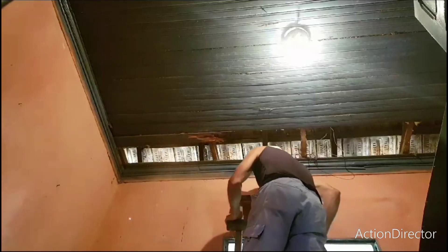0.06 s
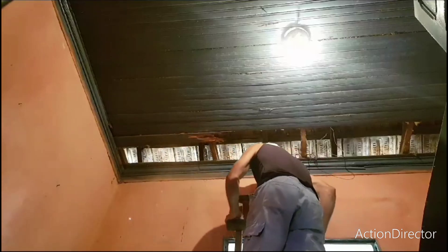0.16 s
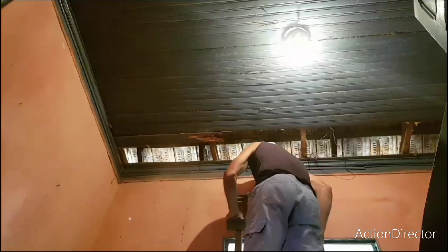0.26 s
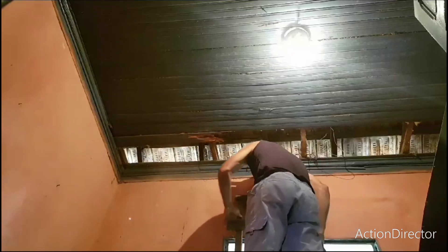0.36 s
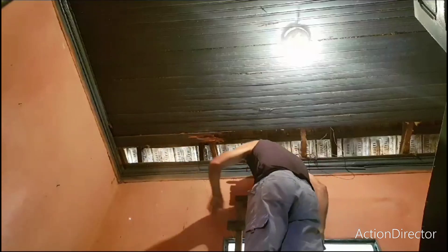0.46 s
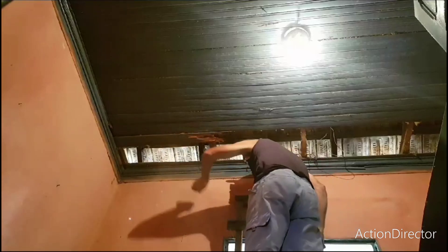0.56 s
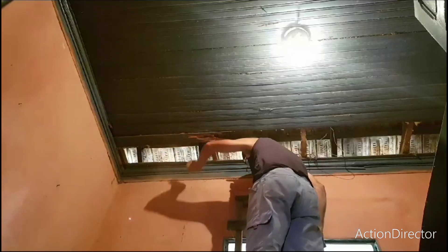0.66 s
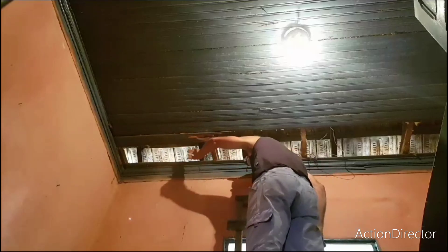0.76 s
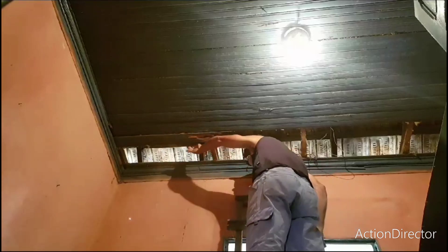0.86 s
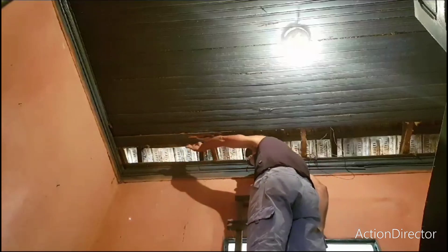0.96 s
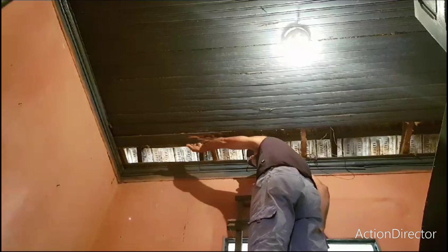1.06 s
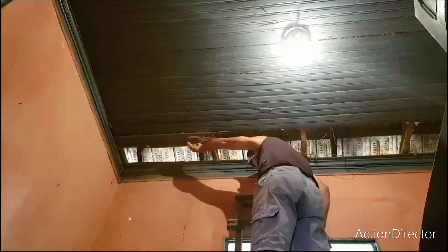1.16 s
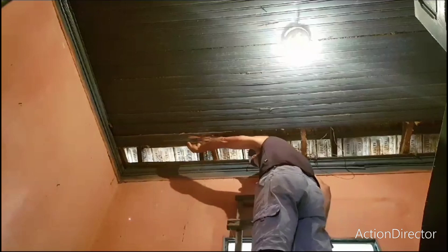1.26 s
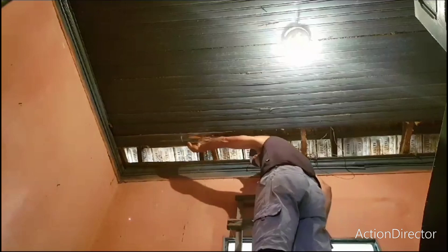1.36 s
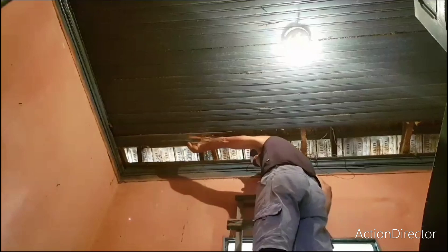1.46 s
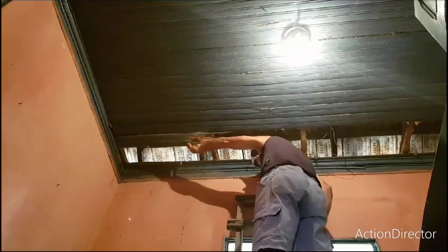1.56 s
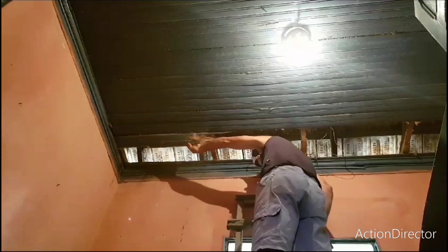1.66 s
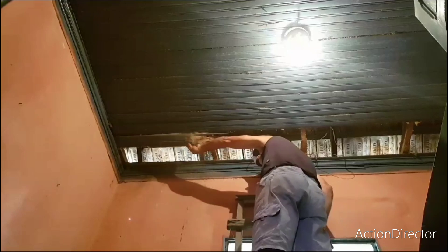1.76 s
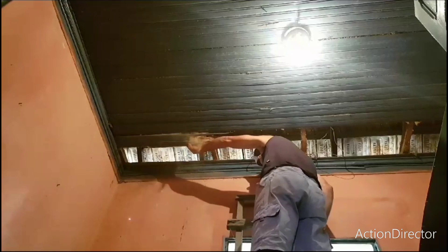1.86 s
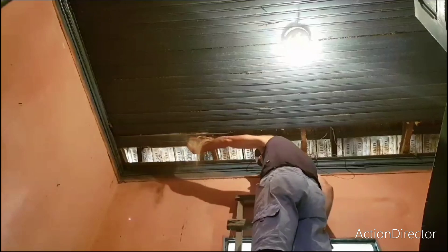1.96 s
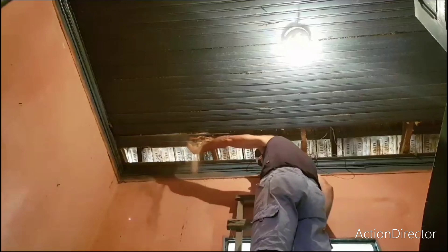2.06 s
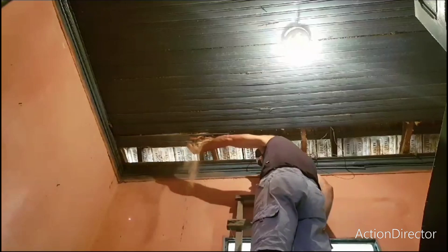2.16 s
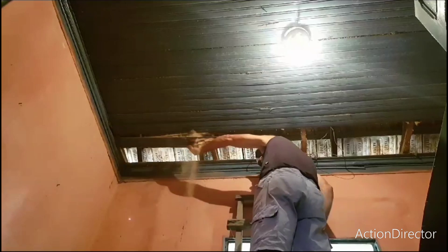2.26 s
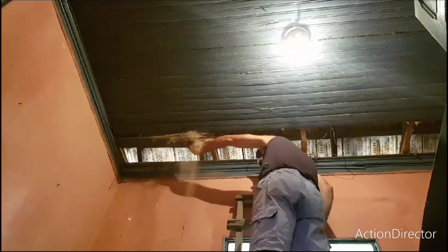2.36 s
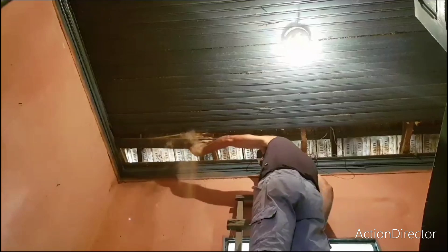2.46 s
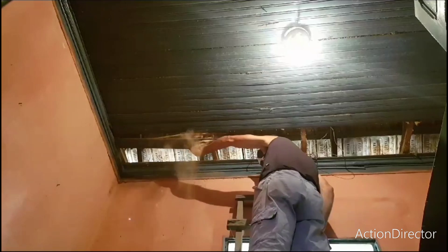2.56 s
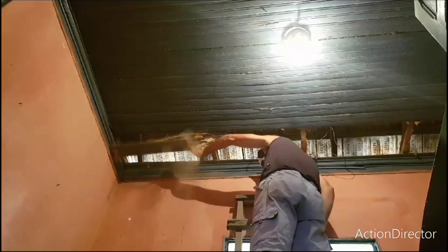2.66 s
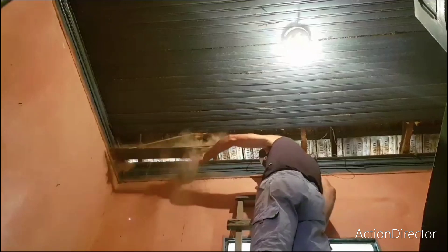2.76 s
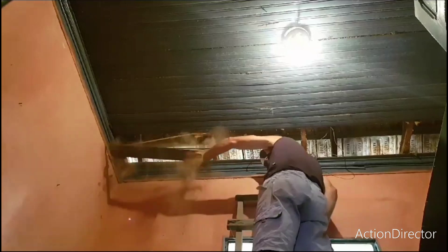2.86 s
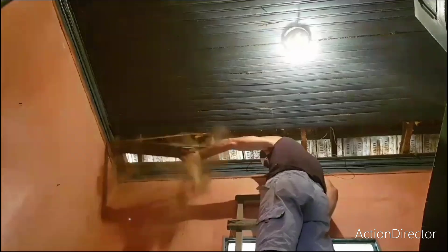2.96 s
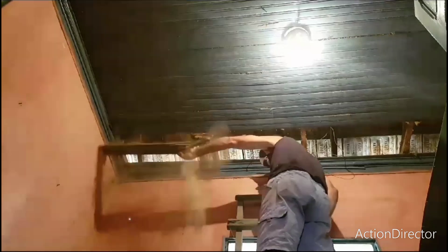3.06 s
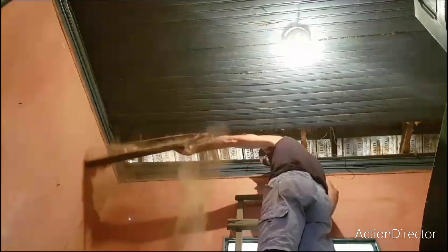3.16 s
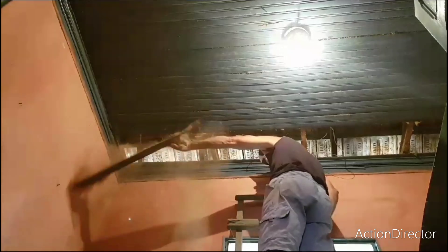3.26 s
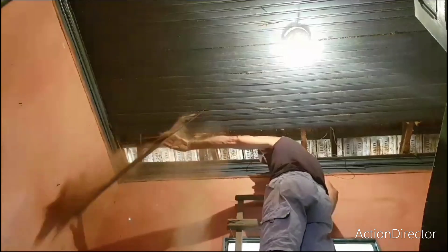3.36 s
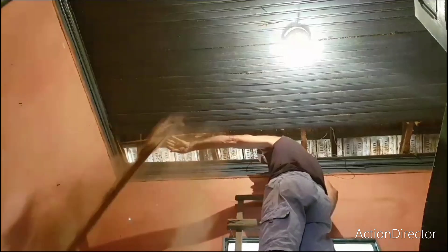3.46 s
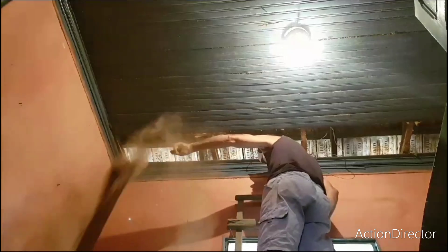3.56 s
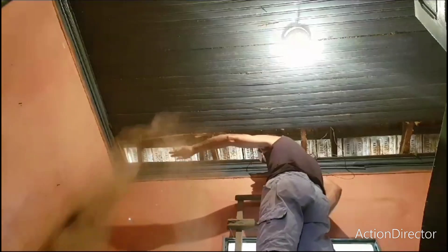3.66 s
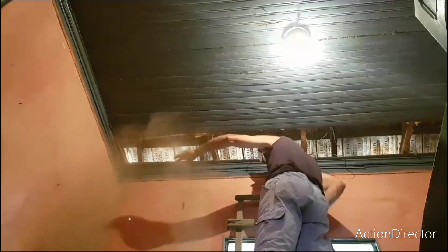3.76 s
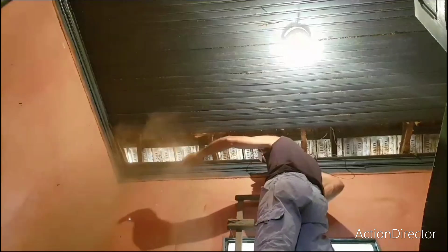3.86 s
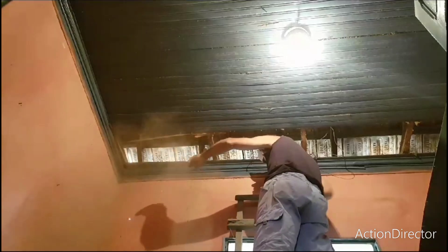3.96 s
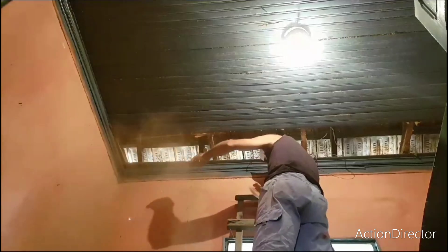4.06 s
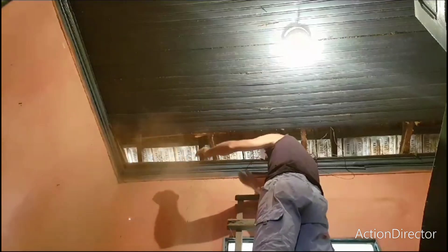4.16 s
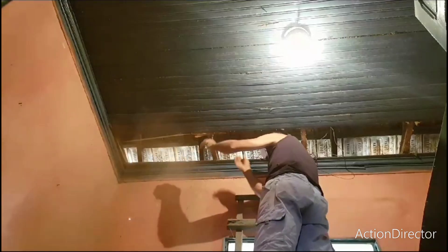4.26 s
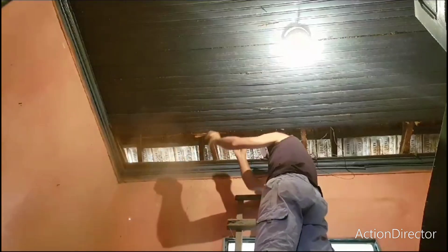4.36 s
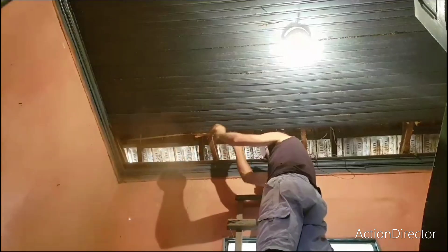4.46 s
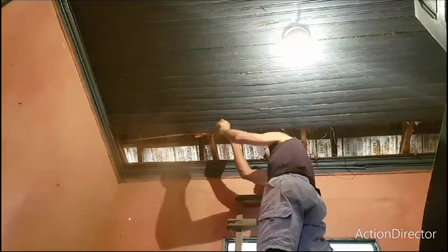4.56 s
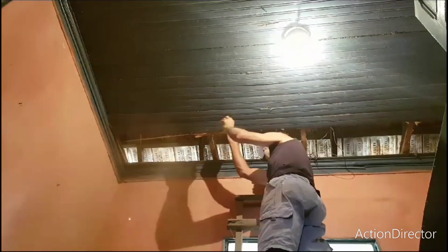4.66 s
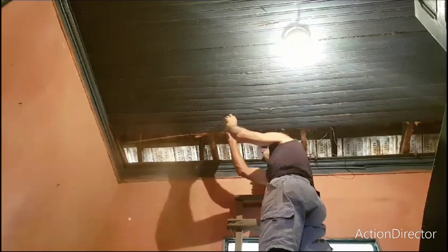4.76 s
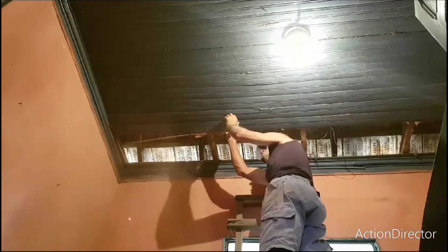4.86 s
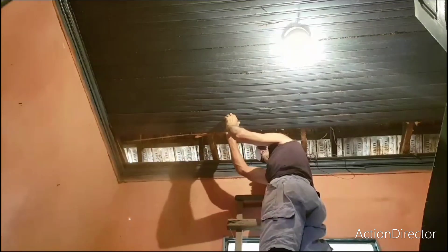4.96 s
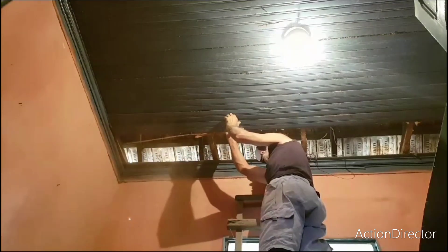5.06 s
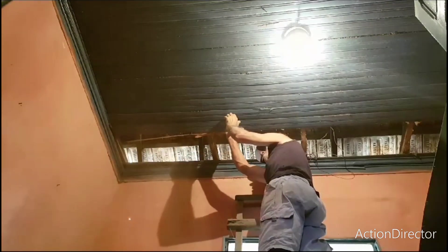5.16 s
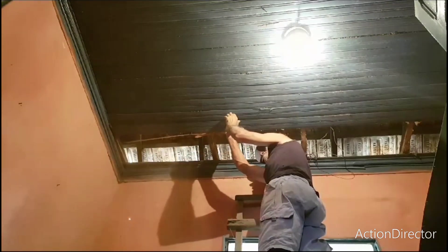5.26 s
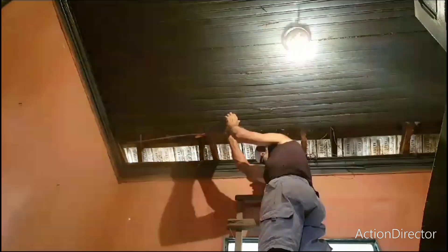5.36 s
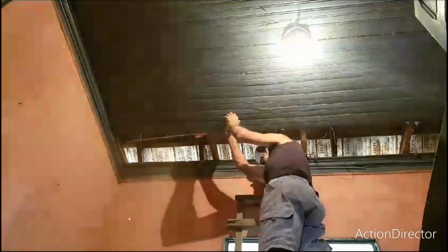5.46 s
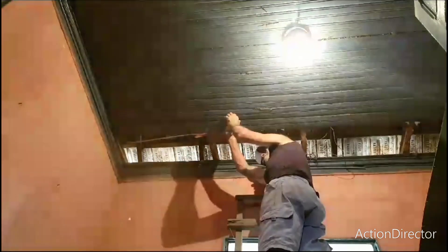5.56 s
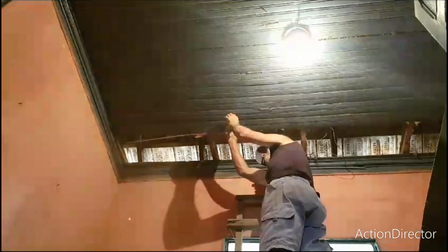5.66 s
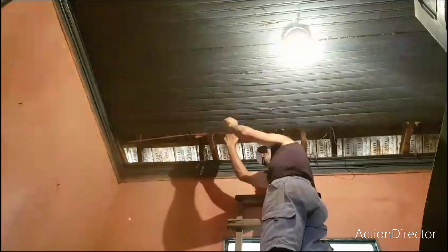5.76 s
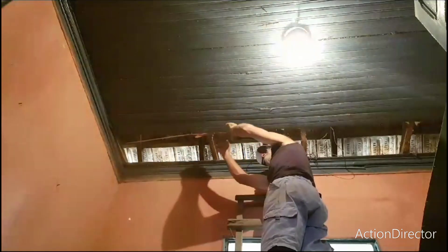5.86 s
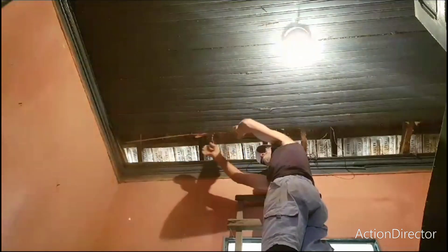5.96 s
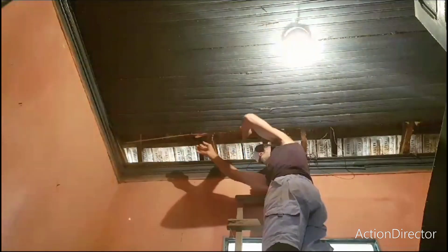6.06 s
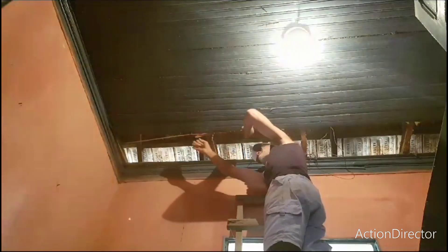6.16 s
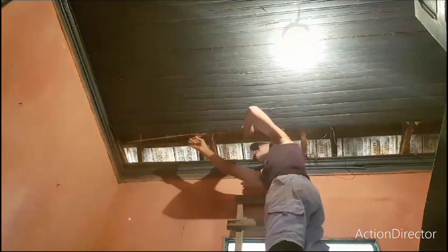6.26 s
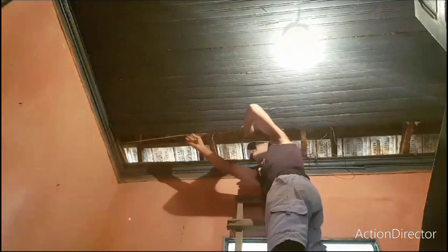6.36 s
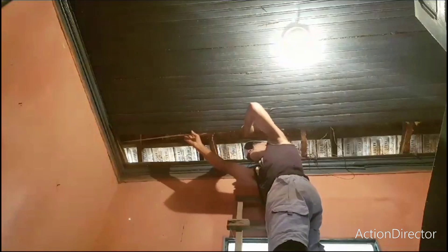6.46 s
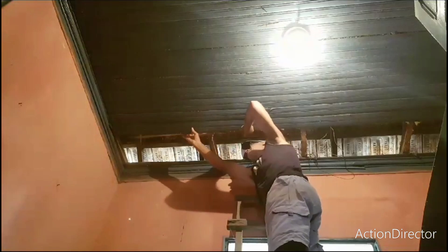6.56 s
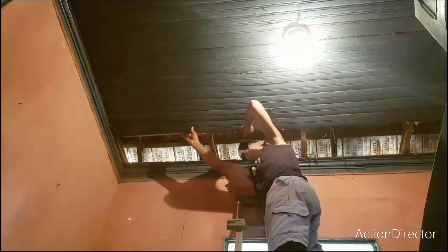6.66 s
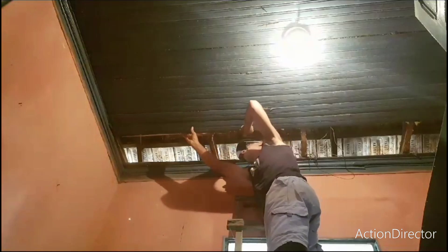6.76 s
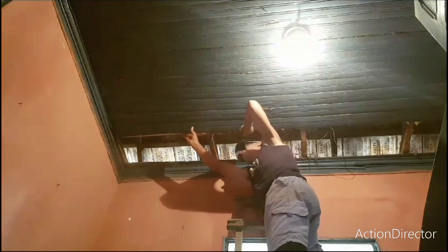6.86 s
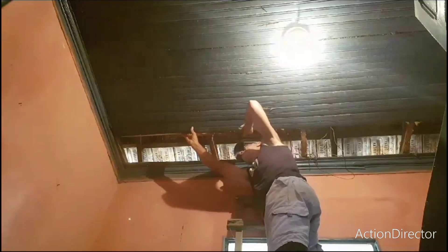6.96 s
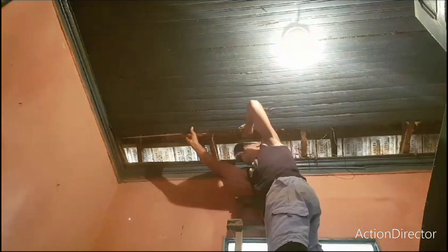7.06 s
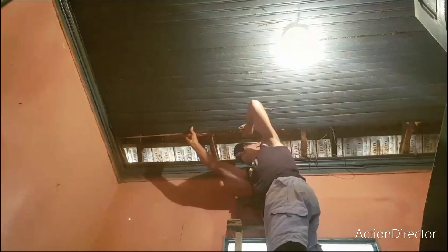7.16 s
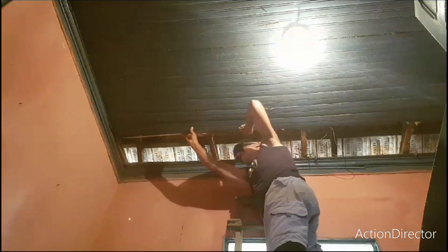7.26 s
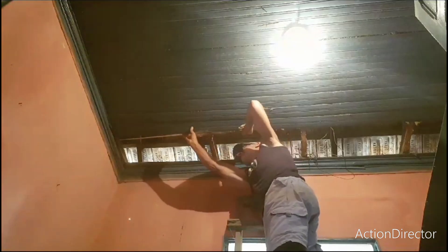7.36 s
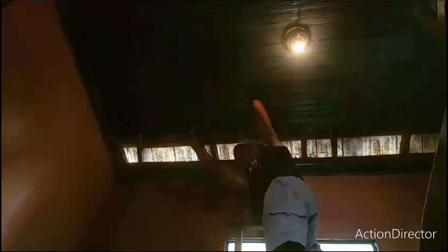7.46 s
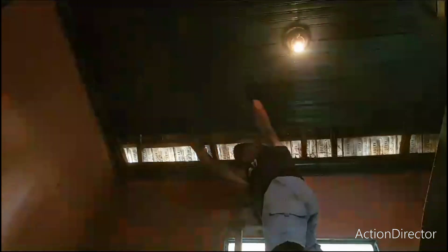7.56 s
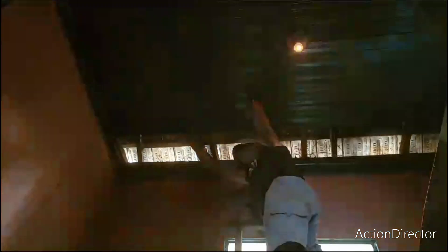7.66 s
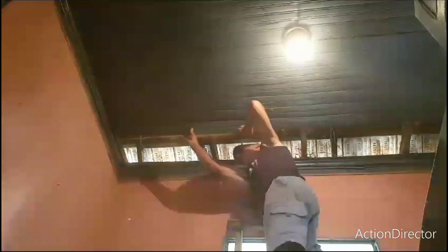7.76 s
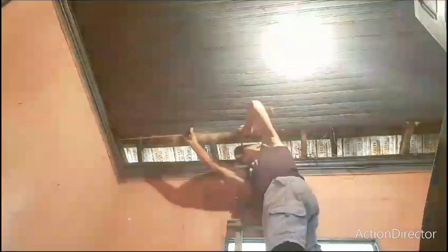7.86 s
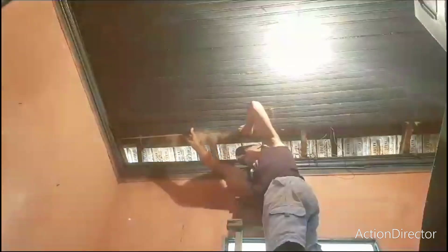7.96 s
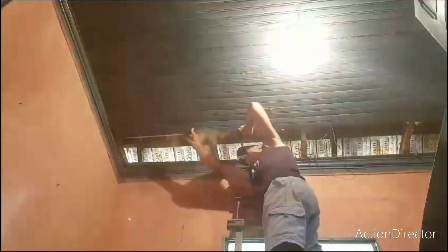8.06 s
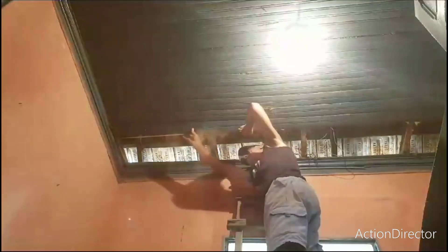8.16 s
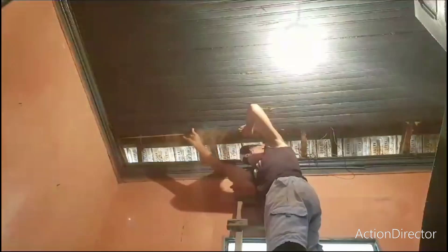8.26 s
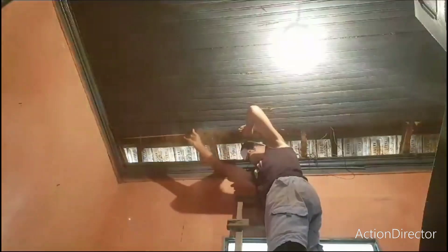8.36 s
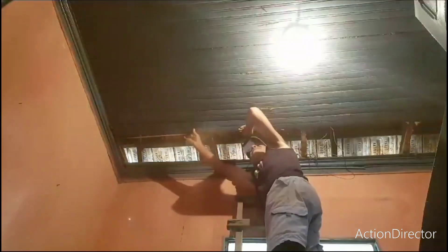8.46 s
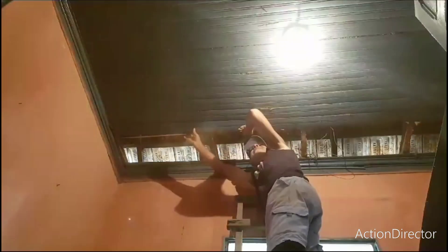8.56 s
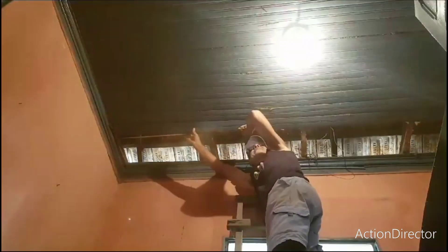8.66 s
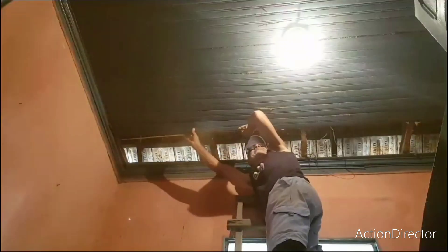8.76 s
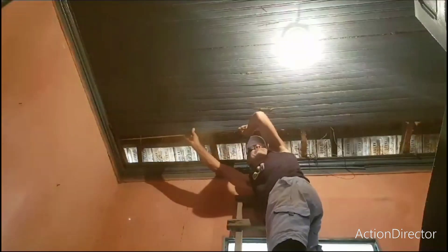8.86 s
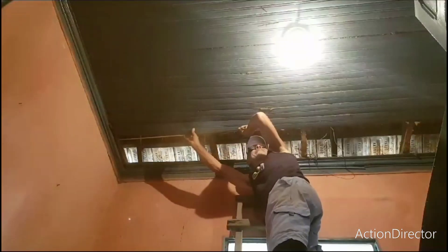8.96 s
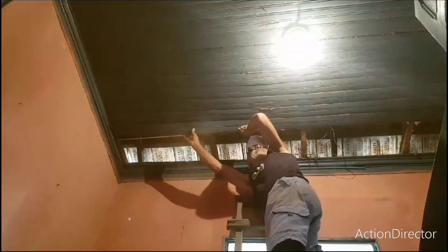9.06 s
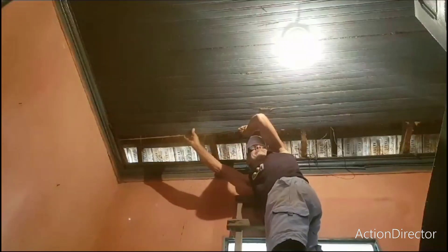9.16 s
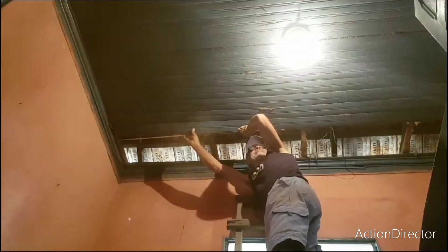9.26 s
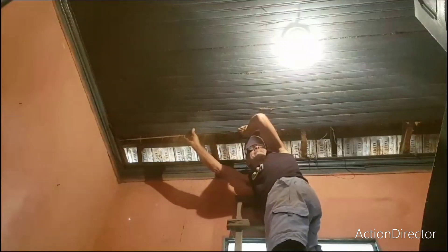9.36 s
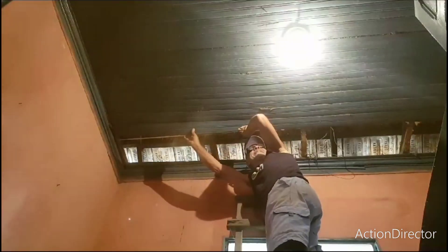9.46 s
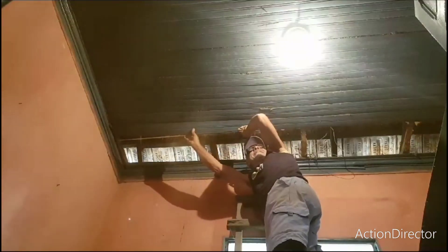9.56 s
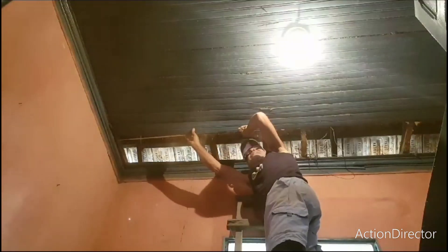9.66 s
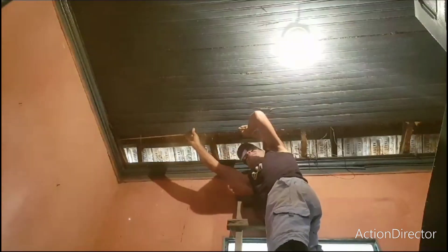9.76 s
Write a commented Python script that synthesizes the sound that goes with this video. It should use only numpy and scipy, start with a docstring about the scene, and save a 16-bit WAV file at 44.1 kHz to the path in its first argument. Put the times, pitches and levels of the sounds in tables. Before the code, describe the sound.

Rotten wooden ceiling boards crack and splinter in bursts as they are pulled down by hand, with crumbs trickling in a small room.

```python
"""Rotten ceiling boards crack and knock as they are torn down by hand in a small bare room.
Each crack is a snap and a spray of breaking fibres over the low thud of the ceiling. Nails slip and
squeal out of the joists; dust and crumbs trickle down in showers of tiny clicks. The hard walls answer
with echoes and a tail, and a low rumble from outside and a thin high whine fill the pauses."""
import sys
import numpy as np
from scipy import signal
from scipy.fft import rfft, irfft, next_fast_len
from scipy.io import wavfile
from scipy.ndimage import map_coordinates

SR = 44100
rng = np.random.default_rng(int(sys.argv[2]) if len(sys.argv) > 2 else 0)


def unload_wav(signal):
    """Save mono or channel-first audio to the path in sys.argv[1] as 16-bit WAV at rate SR, clipped to [-1, 1]."""
    wavfile.write(
        sys.argv[1],
        SR,
        np.round(np.clip(np.atleast_2d(signal).T, -1, 1) * 32767).astype(np.int16),
    )


N = 433062

# colour of the outside rumble: freq_hz, density_db
RUMBLE_EQ = [(12, -38.5), (20, 0.5), (70, 2), (163, -1), (241, -5.5), (301, -12), (542, -20), (1000, -21.5),
             (1220, -26.5), (2080, -27), (2600, -42), (3070, -42), (9670, -52.5), (13000, -43),
             (16000, -51)]
# fader ride on the rumble: time_s, level_db
RUMBLE_RIDE = [(0.0, -46), (1.53, -49.5), (1.91, -43), (2.29, -49.5), (2.76, -45.5), (3.72, -47),
               (4.13, -47.5), (6.51, -50), (8.01, -42.5), (9.08, -46.5), (9.82, -46.5)]
# wavering low tones: pitch_hz, half_width_hz, level_db
DRONES = [(54, 8, -76), (183.9, 4.1, -59.5)]
# drift of the whine: time_s, pitch_hz, level_db
WHINE_PATH = [(0, 12140, -91), (5.8, 12220, -91), (5.9, 12350, -90), (6.4, 12250, -91), (7.0, 12330, -91),
              (9.82, 12300, -92)]
# early reflections: delay_s, gain_db
WALL_ECHOES = [(.004, 1.5), (.009, -5), (0.0169, 1.5), (.024, -7), (.038, -3.5), (.061, -10.5)]
# time the room takes to die by 60 dB: freq_hz, decay_s
ROOM_DECAY = [(100, 0.22), (260, 0.42), (700, 0.4), (1840, 0.39), (4850, 0.36), (12800, 0.25)]
# left-right likeness of the room sound: freq_hz, correlation
STEREO_LIKENESS = [(60, 1), (180, .97), (350, .85), (640, 0.42), (1400, -0.2), (3000, 0.047),
                   (15000, -0.11)]
# colour of falling crumbs: freq_hz, density_db
RUSTLE_EQ = [(240, -27.5), (400, -8), (653, -8), (1020, -4.5), (1200, -11.5), (1430, -5), (2620, -2.5),
             (6500, -23), (8450, -36.5), (14300, -120)]
# colour of grit and dust hiss: freq_hz, density_db
GRIT_EQ = [(2650, -28), (4500, 4.5), (6920, 0), (8200, 3.5), (9070, 1), (13600, 1.5), (16000, -3.5)]
# the constant trickle: rustle_db, hiss_db
TRICKLE_BED = [-73.5, -78]
# crumbs shaken loose or a board dragging, with 30 dB ramps: peak_s, rustle_db, hiss_db, rise_s, fall_s
CRUMB_SHOWERS = [(0.0, -47, -55.5, .1, 0.27), (1.61, -46, -47, 0.18, 0.3), (1.69, -48.5, -47, 0.083, 0.21),
                 (1.88, -44, -45, .3, 0.26), (2.01, -49.5, -67, 0.27, 0.13), (2.6, -47, -49, 0.51, 0.12),
                 (2.759, -22.5, -34, 0.059, 0.13), (2.93, -31.5, -33, 0.083, 0.36),
                 (3.09, -40, -61, 0.58, 0.083), (3.419, -32.5, -33, 0.1, 0.13), (3.56, -49, -53.5, 0.79, 1),
                 (3.99, -57, -51.5, .6, 0.37), (4.06, -29, -34, .03, 0.13),
                 (4.126, -27.5, -19.5, 0.078, 0.12), (4.26, -29, -28, 0.19, 0.17),
                 (4.321, -24, -33, 0.13, 0.14), (4.461, -50.5, -53.5, .3, 0.6),
                 (5.52, -49, -54.5, .17, 0.2), (6.78, -66.5, -74, 0.74, 0.38), (7.4, -76.5, -71, 0.28, 0.3),
                 (8.02, -53, -30, 0.045, 0.12), (8.12, -49, -75, 0.36, 0.35), (8.75, -66, -71, 1, 0.53),
                 (9.03, -66, -69, 0.24, 0.6), (9.38, -54, -51, 0.2, 0.22), (9.57, -41.5, -52, 0.28, 0.071),
                 (9.82, -67, -57, 0.25, .3)]
# the ceiling's low modes: pitch_hz, width_hz, level_db
CEILING_MODES = [(56, 11, -6), (95, 16, -6.5), (144.9, 15, 0.5), (185.3, 13, -2.5), (211.4, 17, -5.5),
                 (248.5, 15, -0.5), (326.5, 18, -7)]
# how the joist colours a squeal: freq_hz, gain_db
JOIST_EQ = [(700, -2), (1050, -6.5), (1450, -7), (2150, 2), (2800, -5.5), (3300, 5.5), (4200, 0.5),
            (5200, -9), (8000, -19)]
# nail cues, thud and reverb send relative to the level:
# start_s, level_db, slip_hz, decay_ms, jitter_turns, thud_db, send_db
NAIL_CUES = [(2.697, -25.5, 1000, 2, 0.013, -12, -1), (2.711, -6.5, 999, 2.5, 0.0096, -22, 1),
             (2.729, -7.5, 943, 1.5, 0.013, -22.5, -2), (2.751, -10.5, 1038, 1.5, 0.01, -20.5, -1),
             (2.772, -10.5, 1063, 2, 0.0097, -25.5, 3), (2.94, -7.5, 1073, 2.2, 0.013, -14.5, 4),
             (2.978, -18, 1090, 3, 0.011, -15, 6), (3.607, -16, 720, 5.7, 0.0023, -24.5, -2.5)]
# bright colour of splintering wood: freq_hz, density_db
SPLINTER_EQ = [(710, -23.5), (1200, -14), (1430, -1), (2300, -2.5), (3510, -4), (4130, -6.5), (4900, -21.5),
               (6500, -20.5), (8450, -26.5), (14300, -120)]
# hollow colour of a knocked board: freq_hz, density_db
KNOCK_EQ = [(180, -28.5), (300, -2.5), (398, -1.5), (512, -9.5), (698, 1.5), (1400, -8), (1820, -34),
            (3080, -120)]
# crack cues; thud, knock, grit and reverb send are trims on the level:
# start_s, level_db, thud_db, knock_db, grit_db, send_db, ring_hz
CRACK_CUES = [(0.0024, -42, -13, 2, -19, -2, 1510), (0.2086, -49, -7, -5, -16, -2, 1470),
              (0.234, -57, -12, 0, -24, -1, 3190), (0.38, -53, 5, -4, -12, 0.5, 1970),
              (0.647, -61.5, 1, 5.5, -6, 0, 1470), (0.792, -64.5, 11, -8, 3.5, 2.5, 2300),
              (0.9411, -63, -2, -6, -2, 8, 3200), (1.4392, -54.5, 1, -4, 1.5, 4, 2010),
              (1.49, -34.5, -23, -20, -3, 1, 3020), (1.5084, -32.5, -12, -10.5, -4, 11, 3000),
              (1.5284, -23.5, -15, -8, 0.5, -0.5, 3600), (1.685, -36, -19, -5, -5, -8, 4000),
              (1.7177, -37.5, -17, -26, 0.5, -4, 3940), (1.7814, -31, -3, -4.5, -4, 1.5, 3930),
              (1.8033, -25.5, -12, -24, -0.5, -5.5, 2200), (1.837, -30.5, -9, 0.5, -13, -16, 4040),
              (1.956, -38.5, -2, -2, 1, 5, 3580), (1.9744, -33.5, 1, -17, -4, -7, 3030),
              (2.236, -50, 4, -15, 3.5, -5, 3500), (2.28, -46, 4, -2.5, -1, 1, 3830),
              (2.3098, -44.5, -7, -18, -5.5, 4, 1640), (2.36, -45.5, -10, -24, 4.5, -6, 1650),
              (2.4434, -40, -14, -13, -3.5, 1, 2890), (2.4829, -33, -2, -10, 1.5, 2, 3060),
              (2.5041, -28.5, 3.5, -4.5, 0.5, 0, 2300), (2.81, -21.5, -9, -12, -21, -8, 3120),
              (3.2509, -34, -2, -3.5, 2, -5.5, 3100), (3.3642, -36, -18, -7, -4, 1, 2500),
              (3.582, -41, 2, -7, -7, 11.5, 2140), (3.917, -46, -8, 1.5, -7, -1, 2165),
              (4.0194, -18, -1.5, 2, -6, -1, 2310), (4.249, -21.5, -15.5, -11.5, -20, -7, 2520),
              (4.3095, -22.5, -10, -2, -10, -3, 1850), (4.333, -22, -11.5, -9.5, -7, 3.5, 1630),
              (4.927, -61, 7.5, -13, -4, 3, 2120), (4.966, -44, -5, -3.5, -10.5, -0.5, 2460),
              (5.347, -41.5, -16, -1.5, -6.5, -2, 3060), (5.3899, -27, -7.5, -0.5, -4.5, -3, 1840),
              (5.929, -64, 11.5, -18.5, -8.5, 6.5, 2127), (6.88, -43.5, -10.5, -7.5, -18, -8.5, 1990),
              (7.3763, -51, -4.5, 4.5, -8, -5, 2280), (7.5872, -27, 11, 3.5, -12.5, 1.5, 2845),
              (7.6171, -24.5, 3.5, 5, -6, -2.5, 1270), (7.9766, -21.5, 5, -2, -12, 5.5, 1490),
              (8.6587, -53.5, -19, -15, -3, -3, 2294), (8.847, -59.5, -4, -3, 2, 0, 1320),
              (9.011, -50.5, -16, -3.5, -0.5, -4.5, 2160), (9.1359, -50, -3, 1, -31, -2, 2170),
              (9.2028, -33.5, -15, -10.5, 2, -1, 2600), (9.3335, -43, -4.5, -2.5, -11, 0, 3280),
              (9.3726, -39, -12, -10, -7, -9, 1520), (9.479, -28.5, -29, -10.5, -7.5, 1.5, 1430),
              (9.7495, -28.5, -14.5, -8.5, -6, -3.5, 2880), (9.78, -24, -14, -6, -11.5, 3, 2320)]
# stereo balance: freq_hz, left_over_right_db
BALANCE = [(100, -1.4), (300, 0), (600, 1.5), (1500, 0.65), (10000, 1.6)]
# the top treble fades steeply above 15 kHz: freq_hz, gain_db
TREBLE_ROLLOFF = [(20, 0.5), (15200, 0), (15600, -14.5), (15900, -33.5), (16500, -48.5)]

TEAR_MS, SNAP_RATIO = 4.6, 0.9  # decay of the fibre spray; first snap over the spray's peak
THUD_HZ = 160  # ceiling modes near here are struck hardest
CLUMP_DB, TOP_HZ = 1.8, 16500  # how much the crumbs clump; band limit of the mix


def amp(db):
    """Decibels to gain."""
    return 10 ** (np.asarray(db) / 20)


def unit(x):
    """Normalise to an RMS of 1."""
    return x / np.sqrt(np.mean(x ** 2) + 1e-20)


def along(points, hz):
    """Read a (freq_hz, value) curve on a log frequency axis."""
    freqs, values = np.transpose(points)
    return np.interp(np.log(hz + 1), np.log(freqs + 1), values)


def automation(rows):
    """One per-sample lane for each column after the time."""
    times, *columns = np.transpose(rows)
    return [np.interp(np.arange(N) / SR, times, column) for column in columns]


def wobble(rate):
    """A smooth random curve, rate knots a second."""
    return map_coordinates(rng.standard_normal(int(N * rate / SR) + 4), [np.arange(N) * rate / SR])


def filtered(x, response):
    """EQ x with a gain given as a function of frequency."""
    n = x.shape[-1]
    size = next_fast_len(n + 8192)
    return irfft(rfft(x, size) * response(np.fft.rfftfreq(size, 1 / SR)), size)[..., :n]


def impulse(eq, size=2048):
    """The tightest (minimum-phase) impulse response with this colour, energy 1."""
    gain = amp(along(eq, np.fft.rfftfreq(size, 1 / SR)))
    cepstrum = irfft(np.log(gain + 1e-6))
    cepstrum[1:size // 2] *= 2
    cepstrum[size // 2 + 1:] = 0
    response = irfft(np.exp(rfft(cepstrum)))
    return response / np.linalg.norm(response)


def mic_pair(pair):
    """Two unrelated signals as two close-set microphones hear them: narrow bass, wide treble."""
    width = lambda hz: np.arccos(np.clip(along(STEREO_LIKENESS, hz), -1, 1)) / 2
    mid, side = filtered(pair, lambda hz: np.array([np.cos(width(hz)), np.sin(width(hz))]))
    return np.array([mid + side, mid - side])


def outside():
    """A bed of low rumble through the walls, with two narrow wavering drones."""
    noise = rng.standard_normal((2, 2, N))
    rumble = unit(filtered(noise[0], lambda hz: amp(along(RUMBLE_EQ, hz))))
    drones = sum(amp(db) * unit(filtered(noise[1], lambda f: 1 / (1 + ((f - hz) / half_width) ** 2)))
                 for hz, half_width, db in DRONES)
    return amp(automation(RUMBLE_RIDE)[0]) * rumble + drones


def whine():
    """A thin, slightly drifting tone near the top of hearing."""
    hz, db = automation(WHINE_PATH)
    return amp(db) * np.sqrt(2) * np.sin(2 * np.pi * np.cumsum(hz) / SR)


def room_tails(tail_db, build_s, count=12):
    """Stereo reverb for several spots on the ceiling: it blooms, then each band dies at its own rate."""
    hz, t, bands = signal.stft(rng.standard_normal((count, 2, SR * 3 // 4)), SR, nperseg=256)
    decay = amp(-60 * t / along(ROOM_DECAY, hz)[:, None])
    tail = signal.istft(bands * decay, SR, nperseg=256)[1]
    tail *= 1 - np.exp(-np.arange(tail.shape[-1]) / SR / build_s)
    return tail * amp(tail_db) / np.linalg.norm(tail, axis=-1, keepdims=True)


def wall_echoes():
    """First slaps off the walls; their paths differ a little for every hit and microphone."""
    taps = np.zeros((2, SR // 10))
    for delay_s, db in WALL_ECHOES:
        taps[[0, 1], round(delay_s * SR) + rng.integers(-12, 12, 2)] = amp(db)
    return taps


def crumbs():
    """Dust and crumbs of rotten wood: dense, uneven clicks in clumps, swelling and dying in showers."""
    t = np.arange(N) / SR
    gains = amp(TRICKLE_BED)[:, None] * np.ones(N)
    for peak_s, rustle_db, hiss_db, rise_s, fall_s in CRUMB_SHOWERS:
        span = slice(max(round((peak_s - 2 * rise_s) * SR), 0), round((peak_s + 2 * fall_s) * SR))
        late = t[span] - peak_s
        swell = amp(-30 * np.maximum(-late / rise_s, late / fall_s))
        gains[:, span] += np.outer(amp([rustle_db, hiss_db]), swell)
    clicks = rng.standard_normal((2, N))
    clicks *= amp(2.8 * rng.standard_normal((2, N)) + CLUMP_DB * wobble(40) + wobble(150))
    rustle = unit(signal.fftconvolve(clicks, impulse(RUSTLE_EQ)[None], axes=1)[:, :N])
    hiss = unit(signal.fftconvolve(clicks, impulse(GRIT_EQ)[None], axes=1)[:, :N])
    return gains[0] * rustle + gains[1] * hiss


def ceiling_thud():
    """The weight under each hit: the ceiling's low modes ring after one push, peak 1."""
    t = np.arange(SR // 2) / SR
    ring = np.zeros(len(t))
    for k, (hz, width_hz, db) in enumerate(CEILING_MODES):
        strength = amp(db - 4.2 * abs(np.log2(hz / THUD_HZ)) + 1.6 * rng.normal())
        ring += strength * np.exp(-np.pi * width_hz * t) * np.sin(2 * np.pi * hz * t + np.pi * k)
    ring *= 1 - np.exp(-t / 0.0043)  # soft attack
    return ring / np.abs(ring).max()


def nail_squeals():
    """A nail slips rapidly for a few ms, a buzz coloured by the joist: (start_s, sound, send, thud)."""
    t = np.arange(2048) / SR
    hits = []
    for start_s, db, slip_hz, decay_ms, jitter, thud_db, send_db in NAIL_CUES:
        envelope = (1 - np.exp(-t / 0.00028)) * np.exp(-t * 1000 / decay_ms)
        turns = slip_hz * t + jitter * np.cumsum(rng.standard_normal(len(t)))  # unsteady slipping
        buzz = envelope * sum(amp(along(JOIST_EQ, k * slip_hz)) * np.sin(2 * np.pi * k * turns)
                              for k in range(1, 12))
        sound = amp(db) * buzz / np.abs(buzz).max()
        hits.append((start_s, sound, amp(send_db) * sound, amp(db + thud_db) * ceiling_thud()))
    return hits


def board_cracks():
    """Wood fibres give way in one snap and a short spray of more: (start_s, sound, send, thud)."""
    t = np.arange(2048) / SR
    splinter, knock, grit = impulse(SPLINTER_EQ), impulse(KNOCK_EQ), impulse(GRIT_EQ)
    hits = []
    for start_s, db, thud_db, knock_db, grit_db, send_db, ring_hz in CRACK_CUES:
        spray = rng.standard_normal(len(t)) * amp(5 * rng.standard_normal(len(t)))
        spray *= np.exp(-t * 1000 / TEAR_MS)
        spray[0] = SNAP_RATIO * np.abs(spray).max()
        ring = np.exp(-np.pi * 450 * t) * np.sin(2 * np.pi * ring_hz * t)  # the loose splinter's note
        bodies = splinter + 0.39 * ring / np.linalg.norm(ring), knock, grit
        gains = amp([db + 19, db + knock_db + 19, db + grit_db + 21])  # from level to energy
        layers = [signal.fftconvolve(spray, body)[:len(t)] for body in bodies]
        sound = sum(gain * layer / np.linalg.norm(layer) for gain, layer in zip(gains, layers))
        # the walls blur the spray, so the reverb is fed a more even colour
        blur = 0.82 * sum(gain * body for gain, body in zip(gains, bodies)) + 0.5 * sound
        hits.append((start_s, sound, amp(send_db) * blur, amp(db + thud_db + 4) * ceiling_thud()))
    return hits


def scene():
    """The mix: each hit lands up front, then off the walls, over crumbs, rumble and whine."""
    tails = room_tails(tail_db=8, build_s=0.014)
    direct, room = np.zeros(N + SR), np.zeros((2, N + 2 * SR))
    for k, (start_s, sound, send, thud) in enumerate(board_cracks() + nail_squeals()):
        start, tail = round(start_s * SR), tails[k % len(tails)]
        direct[start:start + len(sound)] += amp(3) * sound
        direct[start:start + len(thud)] += thud
        for feed, response in (sound, wall_echoes()), (send, tail), (amp(-6.5) * thud, tail):
            wet = signal.fftconvolve(feed[None], response, axes=1)
            room[:, start:start + wet.shape[1]] += wet
    direct = np.array([direct[:N], np.roll(direct, 1)[:N]])  # the left leads by one sample
    debris = crumbs()
    debris += amp(-13.5) * signal.fftconvolve(debris, tails[0], axes=1)[:, :N]
    return direct + mic_pair(room[:, :N] + debris + outside()) + whine()


def record(dry):
    """The mix leans left in the treble and has no sound above 16.5 kHz."""
    colour = lambda hz: amp(along(TREBLE_ROLLOFF, hz) + np.outer([0.5, -0.5], along(BALANCE, hz)))
    return filtered(dry, lambda hz: colour(hz) * (hz < TOP_HZ))


dry = scene()
out = record(dry)
unload_wav(out)
```